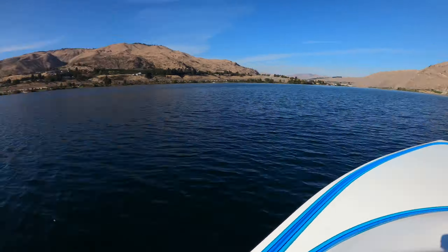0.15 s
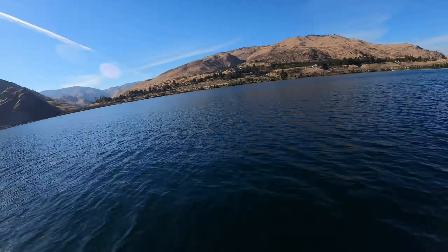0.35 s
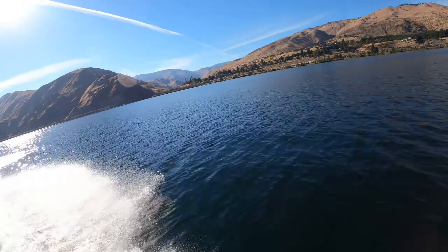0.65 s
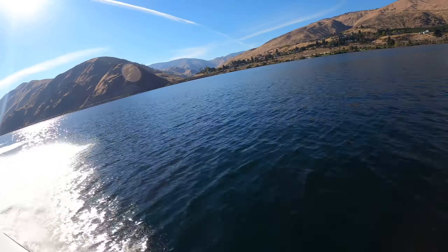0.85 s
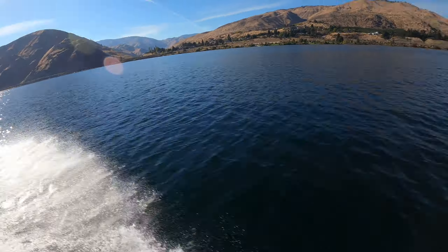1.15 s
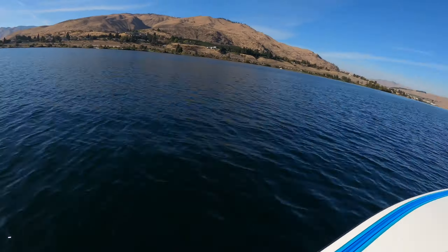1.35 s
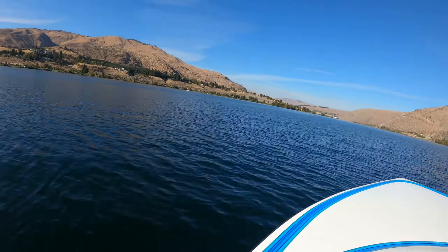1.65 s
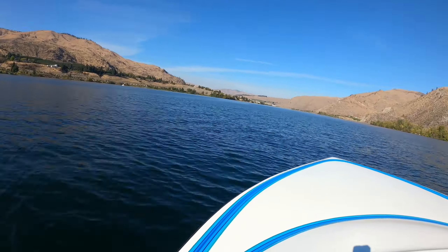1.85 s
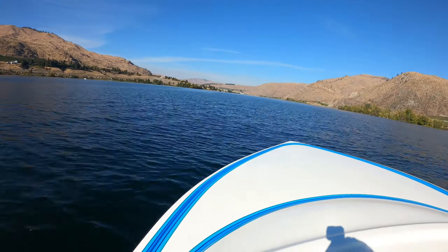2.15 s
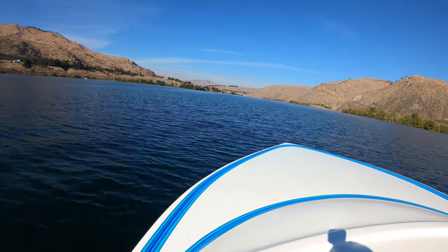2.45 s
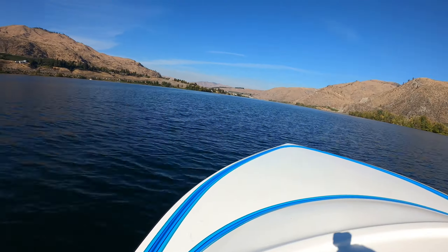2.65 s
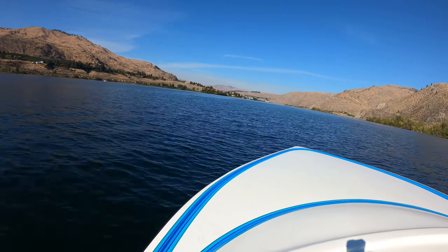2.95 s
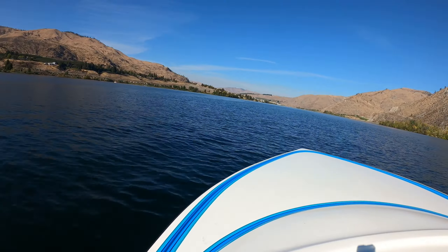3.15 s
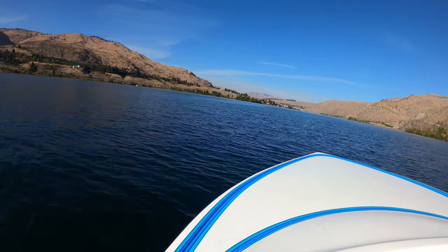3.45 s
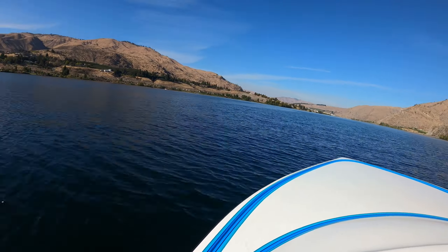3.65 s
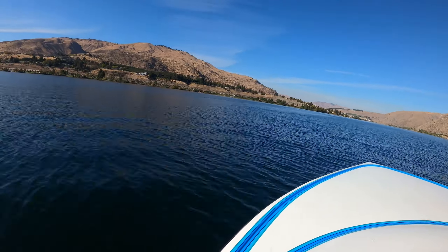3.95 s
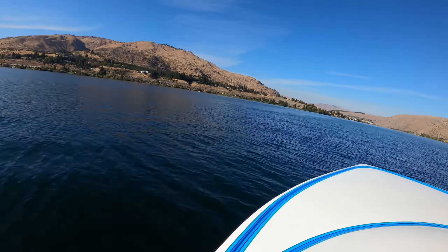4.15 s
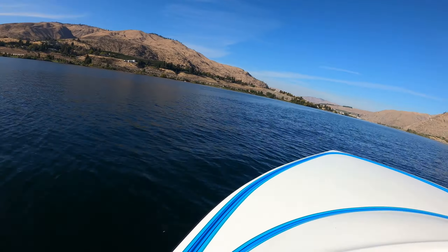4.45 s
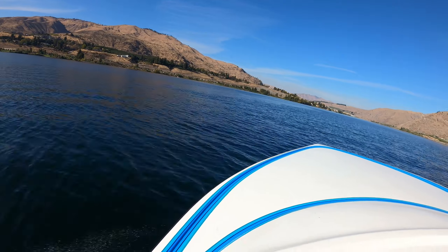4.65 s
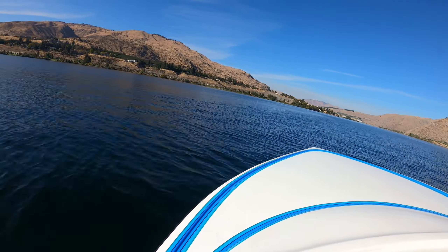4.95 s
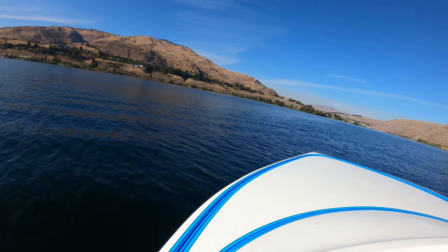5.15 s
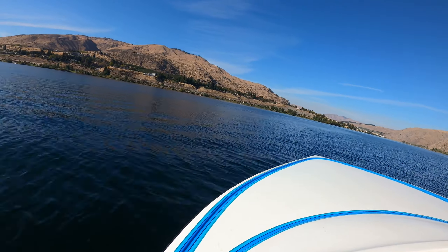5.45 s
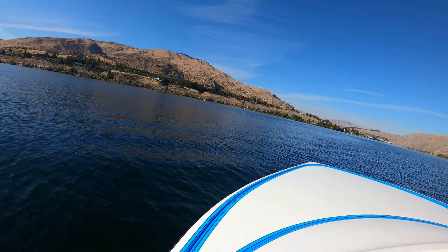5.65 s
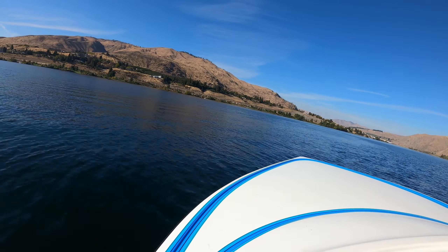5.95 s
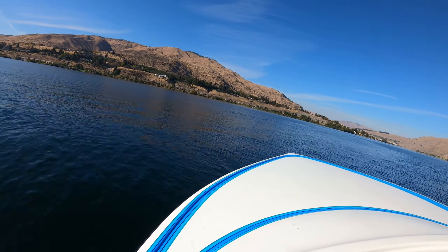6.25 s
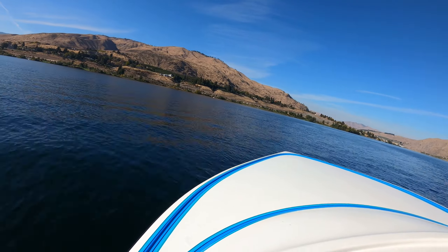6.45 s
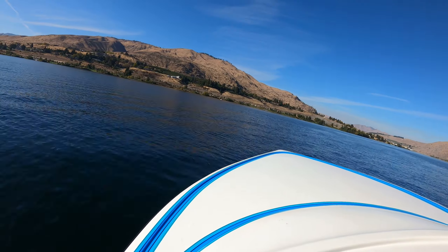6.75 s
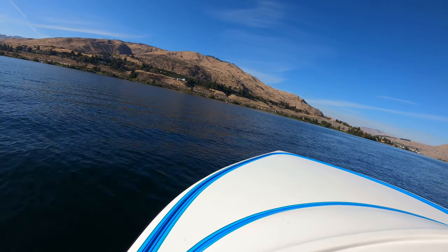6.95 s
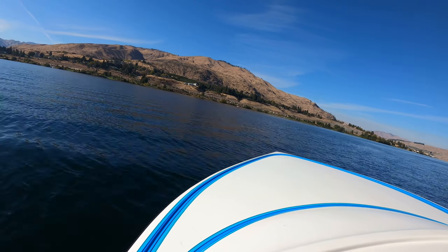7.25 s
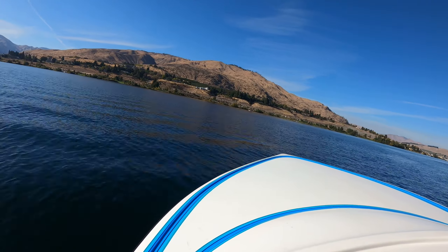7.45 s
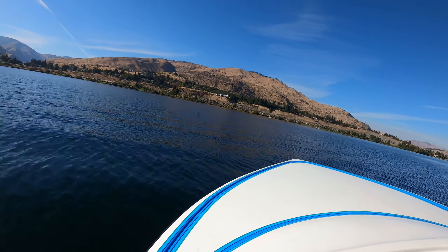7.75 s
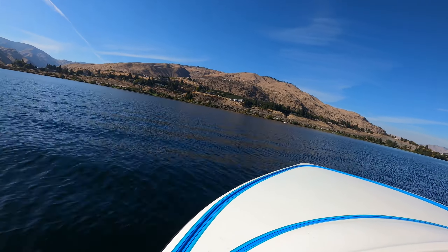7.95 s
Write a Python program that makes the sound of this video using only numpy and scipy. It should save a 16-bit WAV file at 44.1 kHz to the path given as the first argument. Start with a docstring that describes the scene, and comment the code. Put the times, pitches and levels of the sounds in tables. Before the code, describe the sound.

Aboard a cruising motorboat, wind and spray briefly buffet the microphone before the droning engine throttles up over the wash.

```python
"""Open water, aboard a cruising V8 jet boat; the throttle opens at about 4 s.
The wet exhaust drones on the orders of the engine cycle, over hull wash and fizzing foam.
Under strain the firings rasp in the panels and a thin whine rises.
Early on the microphone swings out over the side, into buffeting wind and hissing bow spray."""
import sys
import numpy as np
from scipy import signal
from scipy.fft import rfft, irfft, next_fast_len
from scipy.io import wavfile
from scipy.ndimage import uniform_filter1d, minimum_filter1d

SR = 44100
rng = np.random.default_rng(int(sys.argv[2]) if len(sys.argv) > 2 else 0)


def persist_wave(psi):
    """Save psi, clipped to +-1, as 16-bit WAV."""
    counts = np.round(np.clip(psi, -1, 1) * 32767).astype(np.int16)
    wavfile.write(sys.argv[1], SR, np.atleast_2d(counts).T)


N = 357210
CYLINDERS = 8

# foam along the hull (time [s], level [dB])
FOAM_LEVEL = [(0, -59.5), (2, -60), (2.55, -73), (2.85, -60), (4.65, -60.5), (4.9, -58), (6.55, -56.5),
              (6.9, -60), (8.1, -60.5)]
# bursting bubbles (frequency [Hz], relative density [dB])
FOAM_SPECTRUM = [(1500, -15), (3000, -1.5), (4500, 0.5), (5500, -3), (8000, -4.5), (9500, -15.5),
                 (12500, -20.5), (15000, -32)]
# water and gas rush (frequency [Hz], light-load density [dB/Hz], full-load density [dB/Hz])
WASH_SPECTRUM = [(15, -67, -59.5), (35, -54.5, -52.5), (69, -49, -44), (147, -49, -47), (264, -52.5, -56.5),
                 (460, -60, -54), (730, -60.5, -60.5), (1350, -67, -69), (1620, -69, -70.5),
                 (1800, -75, -76.5), (2120, -77.5, -79), (3050, -87.5, -86), (4460, -94.5, -96.5),
                 (7960, -106, -104), (9900, -116, -113), (14000, -130, -124)]
# gusts on the microphone (start [s], attack [s], hold [s], release [s], level [dB])
WIND_GUSTS = [(0, 0.01, .08, 0.65, -25.5), (.36, .16, 0.94, .15, -16.5), (.475, .02, .02, 0.036, -17),
              (1.238, .05, 0.065, 0.061, -16.5), (3.95, 0.18, .2, .2, -28)]
# wind buffet (frequency [Hz], relative density [dB])
WIND_SPECTRUM = [(12, -11.5), (40, 3), (90, 2.5), (170, 2), (330, -2), (600, -9.5), (1250, -15.5),
                 (2000, -31), (3500, -45), (8000, -72)]
# spray sheets (start [s], attack [s], hold [s], release [s], relative level [dB], brightness [dB])
SPRAY_SHEETS = [(0.323, .06, 0.084, 0.054, -37, -8.5), (0.472, 0.019, .012, 0.043, -32.5, -29),
                (0.518, 0.12, 0.6, .1, -35, -14.5), (0.847, .04, 0.058, 0.033, -36.5, -12),
                (1.332, 0.026, .025, 0.083, -33, -15.5), (1.461, 0.036, .03, 0.35, -32.5, -14.5),
                (1.535, .05, .06, 0.059, -39.5, -2), (1.803, 0.13, .06, 0.045, -42.5, -16),
                (3.78, .3, 0.35, .07, -43.5, -17.5)]
# coarse splash (frequency [Hz], relative density [dB])
SPLASH_SPECTRUM = [(500, -12.5), (1400, 6), (2200, 1), (3200, -1.5), (4600, -8), (6500, -25.5),
                   (10000, -51)]
# fine mist (frequency [Hz], relative density [dB])
MIST_SPECTRUM = [(2000, -22.5), (4000, 2), (5500, 3), (8000, -3), (10000, -16), (11500, -25),
                 (14000, -40.5)]
# water slapping the bow (time [s], relative level [dB])
BOW_SLAPS = [(.368, -42), (.47, -33), (.515, -46), (.705, -36), (.853, -31), (1.37, -28), (1.412, -38),
             (4.015, -46), (4.097, -48), (4.485, -46)]
# panel resonances (frequency [Hz], width per pass [Hz], relative gain [dB])
PANEL_MODES = [(634, 91, 2), (766, 97, 8), (1037, 130, 5), (1257, 140, -2.5), (1595, 190, -7),
               (2000, 320, -8), (2302, 180, -13), (2470, 420, -20)]
# microphone position over the side (time [s], reach [0-1])
MIC_SWING = [(0, 0.04), (.2, 0.06), (.8, 0.71), (1.35, 1), (1.55, 0.52), (1.95, 0.18)]
# throttle (time [s], load [0-1])
ENGINE_LOAD = [(0, 0), (3, 0.06), (3.8, 0), (4.3, 0.64), (4.8, 0.75), (8.1, 1)]
# engine speed (time [s], firing rate [Hz])
FIRING_RATE = [(0, 259.8), (.3, 255.2), (.65, 274.5), (.85, 272.8), (1.18, 292), (1.63, 259.7),
               (1.84, 265.7), (2.09, 255.9), (2.35, 266.1), (2.53, 256.5), (2.77, 269.4), (3.6, 260.5),
               (4.21, 264.6), (4.45, 315.5), (4.6, 298), (4.89, 277.4), (5.08, 311.6), (5.33, 288.6),
               (5.54, 284.1), (5.7, 304), (6.25, 304), (6.86, 311.8), (7.1, 324), (7.37, 326.9),
               (7.7, 315.5), (7.95, 326.5)]
# exhaust note (order [x cycle rate], light-load gain [dB], full-load gain [dB])
EXHAUST_ORDERS = [(2, -30.5, -18), (3, -16, -16), (4, -32, -26.5), (5, -25.5, -32), (6, -58.5, -35),
                  (7, -52, -27), (8, -15, -15.5), (9, -32, -27), (10, -31.5, -26), (11, -25, -22),
                  (12, -41.5, -34), (13, -28.5, -30), (14, -34, -40.5), (15, -43, -37), (16, -30.5, -28.5),
                  (17, -46.5, -32), (18, -41, -30.5), (19, -38, -28), (20, -41.5, -43.5), (21, -36.5, -35),
                  (22, -34.5, -40.5), (23, -39, -46.5), (24, -35.5, -41), (25, -45.5, -35),
                  (26, -48.5, -33), (27, -52.5, -41.5), (28, -54, -38), (29, -46, -36.5), (30, -39, -43.5),
                  (31, -45, -36.5), (32, -52.5, -52.5), (33, -43, -49.5), (34, -48.5, -44.5),
                  (35, -45.5, -57), (36, -41.5, -44), (37, -45.5, -52), (38, -52, -50), (39, -47, -55),
                  (40, -48.5, -51.5), (41, -57, -46.5), (42, -48.5, -61.5), (43, -49.5, -49.5),
                  (44, -48.5, -51), (45, -46.5, -53.5)]


def undb(db):
    """Decibels to gain."""
    return 10 ** (np.asarray(db) / 20)


def unit(x):
    """Scale to rms 1."""
    return x / np.std(x)


def curve(rows):
    """Linear interpolation of (time [s], value) rows."""
    return np.interp(np.arange(N) / SR, *np.transpose(rows))


def swell(start_s, attack_s, hold_s, release_s):
    """Linear rise, hold, Gaussian fall to 1/e at release_s."""
    age_s = np.arange(N) / SR - start_s
    fall = np.maximum(age_s - attack_s - hold_s, 0) / release_s
    return np.clip(age_s / attack_s, 0, 1) * np.exp(-fall ** 2)


def walk(rate_hz):
    """Closed loop of linearly joined random levels; spread near 1."""
    steps = int(rate_hz * N / SR) + 1
    levels = rng.standard_normal(N // 20)[:steps]
    loop = np.r_[levels, levels[0]]
    return np.sqrt(3 / 2) * np.interp(np.linspace(0, steps, N), np.arange(steps + 1), loop)


def colour(noise, spectrum):
    """Shape white noise of rms 1 to (frequency [Hz], density [dB/Hz]) rows."""
    hz, db = np.transpose(spectrum)
    size = next_fast_len(N)
    bins_hz = np.maximum(np.arange(size // 2 + 1) * SR / size, 1)
    gain = undb(np.interp(np.log(bins_hz), np.log(hz), db)) * np.sqrt(SR / 2)
    return irfft(rfft(noise, size) * gain, size)[:N]


def ring(x, hz, width_hz, passes=2):
    """Cascaded resonator, unity gain at centre."""
    for _ in range(passes):
        x = signal.lfilter(*signal.iirpeak(hz, hz / width_hz, fs=SR), x)
    return x


def foam(fizz_db=1.5, surge_db=1.4):
    """Countless small bubbles burst along the hull."""
    bubbles = rng.standard_normal(N) * undb(fizz_db * walk(900) + surge_db * walk(25))
    return unit(colour(bubbles, FOAM_SPECTRUM)) * undb(curve(FOAM_LEVEL))


def wash(cycle, load, throb=0.19, surge_db=0.36):
    """Churned water and exhaust gas throb with the crankshaft and fill out under load."""
    hz, light_db, full_db = np.transpose(WASH_SPECTRUM)
    crank = 1 + throb * np.sin(2 * np.pi * 2 * cycle)  # two turns per cycle
    churn = rng.standard_normal(N) * crank * undb(surge_db * walk(13))
    return (1 - load) * colour(churn, np.c_[hz, light_db]) + load * colour(churn, np.c_[hz, full_db])


def wind(buffet_db=1.0):
    """Eddies break over the microphone in quick uneven puffs."""
    power = sum((undb(db) * swell(*shape)) ** 2 for *shape, db in WIND_GUSTS)
    eddies = rng.standard_normal(N) * undb(buffet_db * walk(60))
    return unit(colour(eddies, WIND_SPECTRUM)) * np.sqrt(power)


def spray(splash_db=2.0, mist_db=1.5, slap_decay_s=0.0072, sputter_db=0.9):
    """Droplets fall in sputtering sheets; each bow slap throws a short bright burst."""
    t = np.arange(N) / SR
    patter = undb(1.3 * walk(70) + 2.6 * walk(1200))
    splash = unit(colour(rng.standard_normal(N) * patter, SPLASH_SPECTRUM))
    mist = unit(colour(rng.standard_normal(N) * patter, MIST_SPECTRUM))
    splash_power, mist_power = np.zeros(N), np.zeros(N)
    for *shape, db, bright_db in SPRAY_SHEETS:
        power = (undb(db) * swell(*shape)) ** 2
        splash_power += power
        mist_power += power * undb(bright_db) ** 2
    out = undb(splash_db) * np.sqrt(splash_power) * splash + undb(mist_db) * np.sqrt(mist_power) * mist
    out *= undb(sputter_db * walk(45))
    for start_s, db in BOW_SLAPS:
        burst = (t >= start_s) * np.exp(-np.abs(t - start_s) / slap_decay_s)
        out += undb(db) * burst * (splash + mist) / 2
    return out


def pump_strain(firing_hz, load, lag_s=0.65, reference_hz=297.8, drag_db_per_hz=0.3825):
    """The pump bites after the throttle opens, harder where it drags the speed down; peak near 1."""
    pole = np.exp(-1 / (lag_s * SR))
    bite = signal.lfilter([1 - pole], [1, -pole], load)
    return bite * undb(drag_db_per_hz * (reference_hz - firing_hz))


def whine(strain, hz=2255, width_hz=45, level_db=-50.5):
    """Narrow resonance, likely the jet pump; steady pitch, power follows strain."""
    return unit(ring(rng.standard_normal(N), hz, width_hz)) * np.sqrt(strain) * undb(level_db)


def rasp(cycle, strain, gas_share=0.65, puff_s=0.0078, level_db=-27.5):
    """Each firing knocks the panels, some cylinders harder; a puff of gas follows."""
    firings = np.flatnonzero(np.diff(np.floor(cycle * CYLINDERS))) + 1
    cycle_rad = 2 * np.pi * cycle[firings]
    cylinder_db = 4 * np.cos(3 * cycle_rad) + 3 * np.cos(2 * cycle_rad)
    knocks = np.zeros(N)
    knocks[firings] = undb(cylinder_db + rng.standard_normal(len(firings)))
    puffs = signal.lfilter([1], [1, -np.exp(-1 / (puff_s * SR))], knocks)
    gas = puffs * rng.standard_normal(N)
    push = unit(knocks) * (1 - gas_share) + unit(gas) * gas_share
    panels = sum(undb(db) * ring(push, hz, width_hz) for hz, width_hz, db in PANEL_MODES)
    return unit(panels) * strain * undb(level_db)


def hull_boom(drone, hz=650, width_hz=50, gain_db=-6):
    """Orders swell as they cross a hull resonance."""
    return undb(gain_db) * ring(drone, hz, width_hz, passes=1)


def exhaust(cycle, firing_hz, load, strain, gain_db=-0.3, strain_db=2.5, shade_db=-7,
            upper_shade_db=-2.5, dip_db=-3, muffle_db=-9, sway_db=0.83, jitter_rad=0.14, count=68):
    """Uneven firings in two banks put a line on each cycle order; high ones waver most."""
    swing = curve(MIC_SWING)  # the hull screens the swung-out microphone
    overall_db = gain_db + strain_db * strain + shade_db * swing
    # upper orders also dip briefly on the swing back
    upper_db = upper_shade_db * swing + dip_db * swell(1.25, 0.28, 0.45, 0.19)
    # rising speed pushes high orders into the treble that the hull muffles
    muffled_db = muffle_db * load * np.log2(firing_hz / 300)
    orders, light_db, full_db = np.transpose(EXHAUST_ORDERS)
    cycle_hz = FIRING_RATE[0][1] / CYLINDERS
    wavers = [walk(7) for _ in range(count // 8)]
    flutters = [walk(28) for _ in range(count // 8)]
    scatter_db = 1.4 * rng.standard_normal(count)
    shifts = rng.integers(0, N, (count, 2))
    start_rad = rng.uniform(0, 2 * np.pi, count)
    out = np.zeros(N)
    for k in range(2, count):
        if k <= orders[-1]:
            db = (1 - load) * light_db[k - 2] + load * full_db[k - 2]
        else:  # top orders die away in the wet exhaust
            db = -55 - 0.7 * (k - orders[-1]) + scatter_db[k]
        treble = min(k * cycle_hz / 900, 1.5)
        upper = np.clip((k - CYLINDERS) / 2, 0, 1)  # above the firing rate
        waver = np.roll(wavers[k % len(wavers)], shifts[k, 0])
        flutter = np.roll(flutters[k % len(flutters)], shifts[k, 1])
        db += upper * upper_db + treble * muffled_db
        db += sway_db * (0.27 + upper + treble) * waver
        flutter_rad = jitter_rad * (0.14 + 3 * treble) * flutter
        out += undb(db) * np.sin(2 * np.pi * k * cycle + start_rad[k] + flutter_rad)
    return np.sqrt(2) * out * undb(overall_db)


def scene(inertia_s=0.1, speed_jitter=0.0015):
    """Speed and load drive engine and wash; foam, wind and spray add on top."""
    firing_hz = uniform_filter1d(curve(FIRING_RATE), int(inertia_s * SR), mode="nearest")
    load = curve(ENGINE_LOAD)
    strain = pump_strain(firing_hz, load)
    cycle = np.cumsum(firing_hz * (1 + speed_jitter * walk(16))) / SR / CYLINDERS
    drone = exhaust(cycle, firing_hz, load, strain)
    engine = drone + hull_boom(drone) + rasp(cycle, strain) + whine(strain)
    return (engine + wash(cycle, load) + foam() + wind() + spray())[None]


def record(dry, ceiling=0.78, cutoff_hz=15100):
    """Smooth peak limiter, then a steep low-pass."""
    window = SR // 50  # 20 ms
    gain = ceiling / np.maximum(np.abs(dry), ceiling)
    gain = uniform_filter1d(minimum_filter1d(gain, window), window)
    lowpass = signal.ellip(8, 0.2, 70, cutoff_hz, fs=SR, output="sos")
    return signal.sosfilt(lowpass, dry * gain)


dry = scene()
out = record(dry)
persist_wave(out)
```